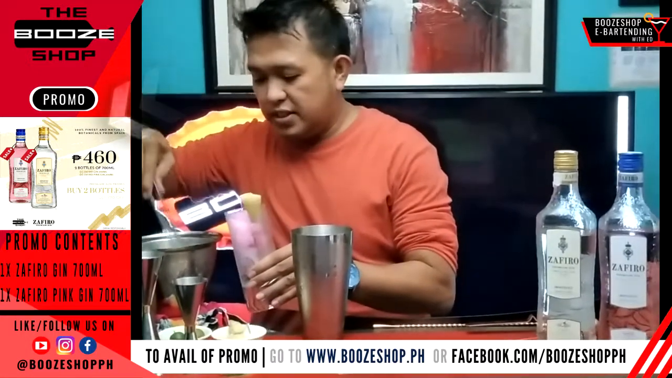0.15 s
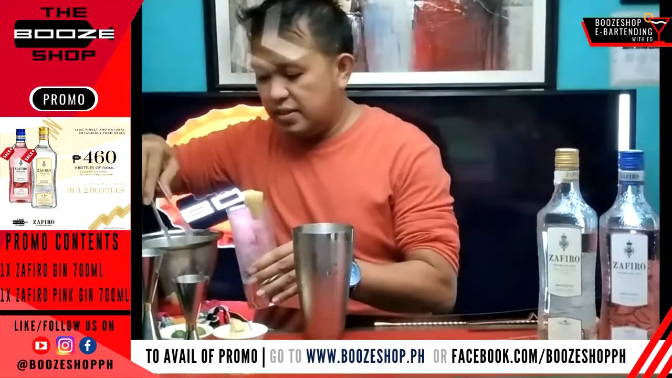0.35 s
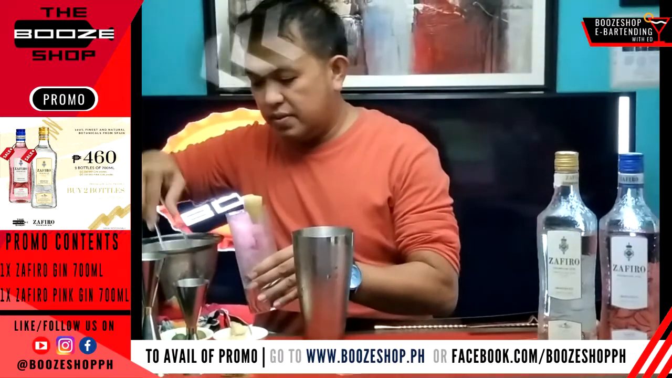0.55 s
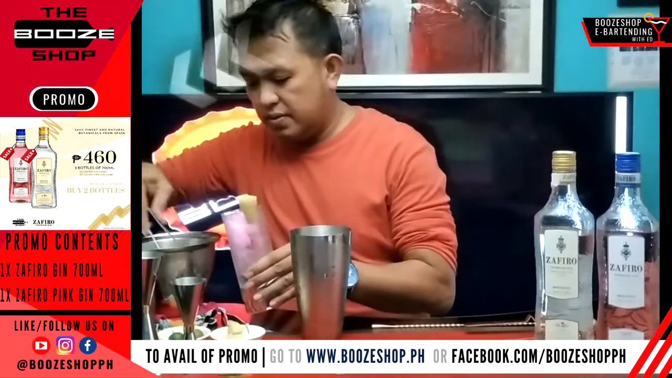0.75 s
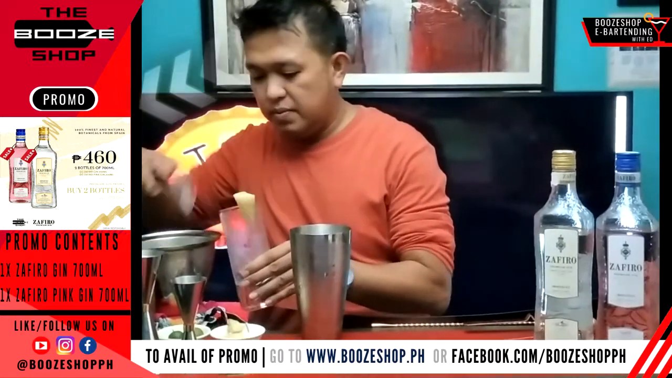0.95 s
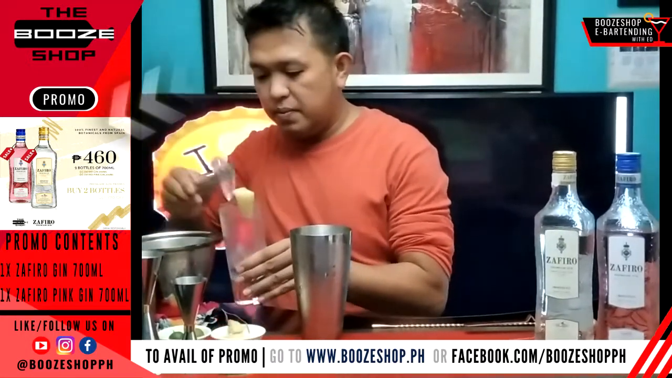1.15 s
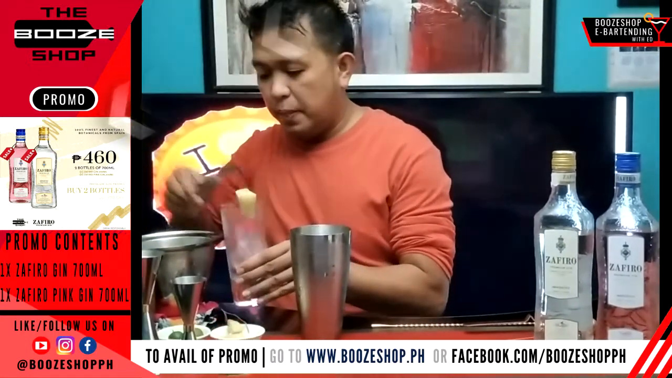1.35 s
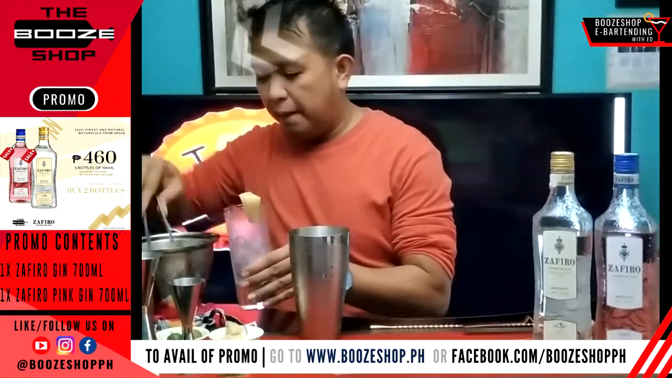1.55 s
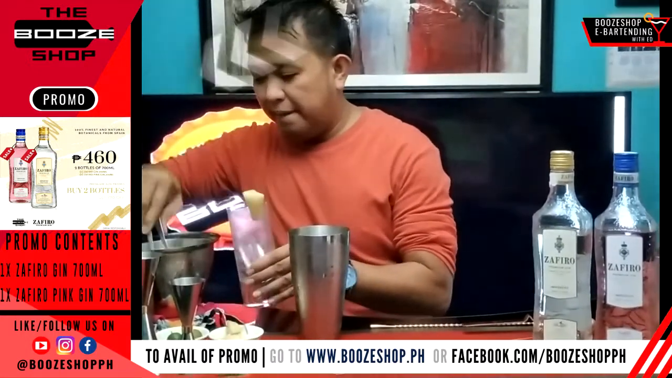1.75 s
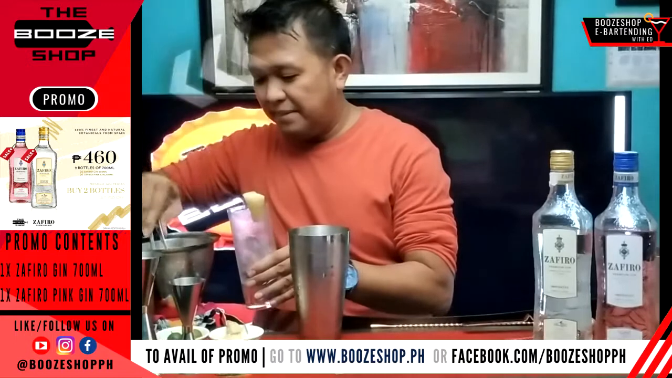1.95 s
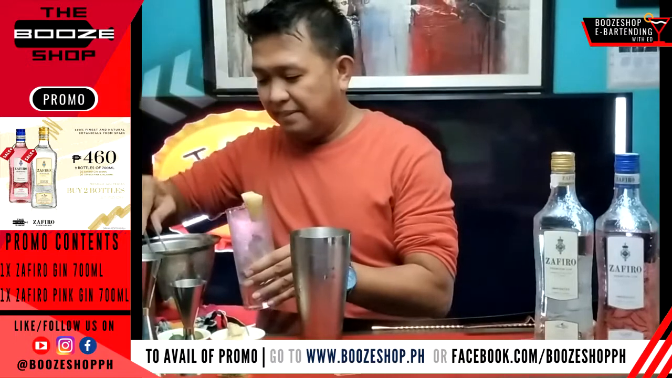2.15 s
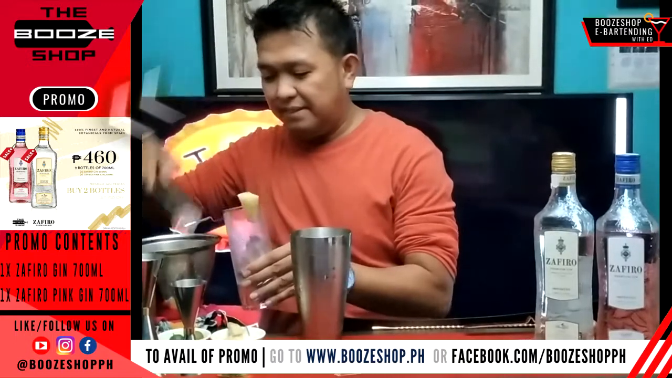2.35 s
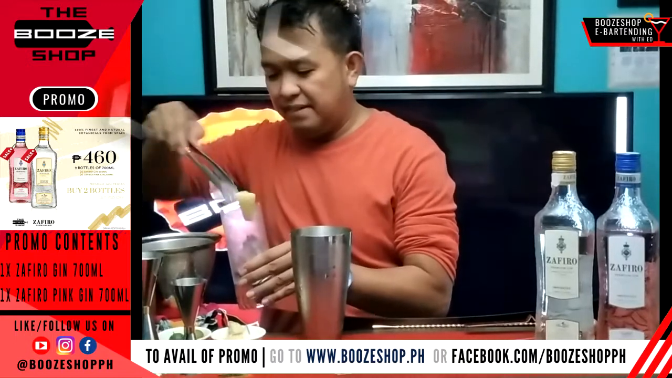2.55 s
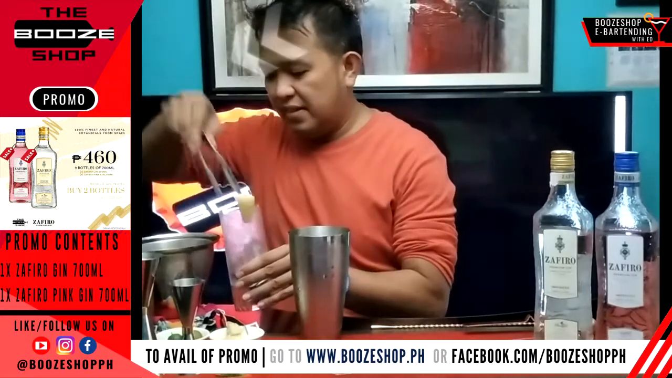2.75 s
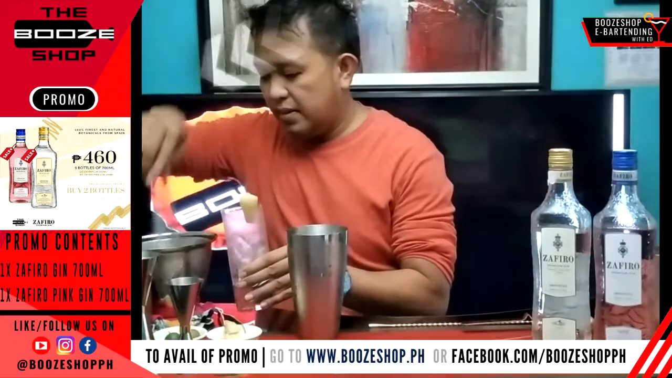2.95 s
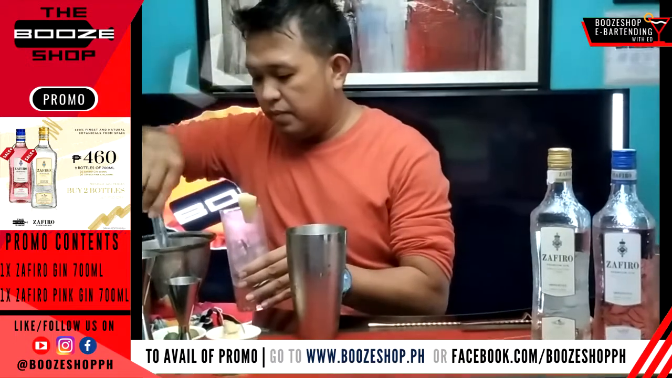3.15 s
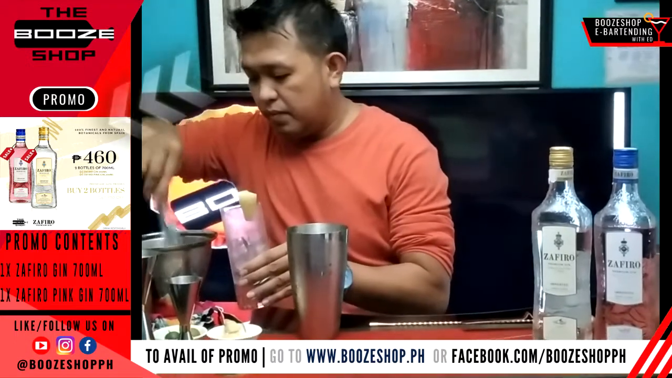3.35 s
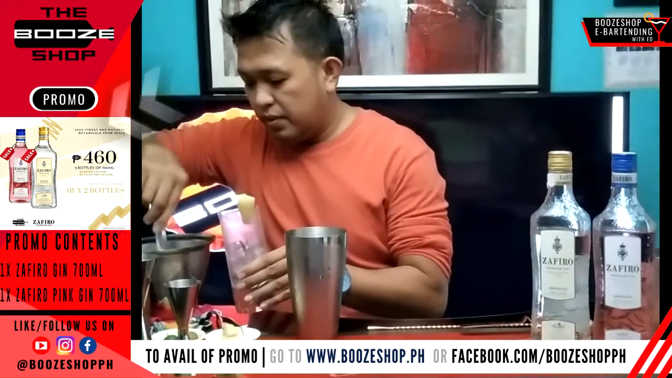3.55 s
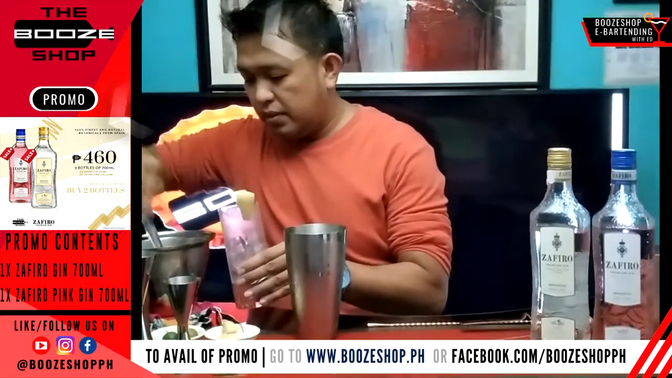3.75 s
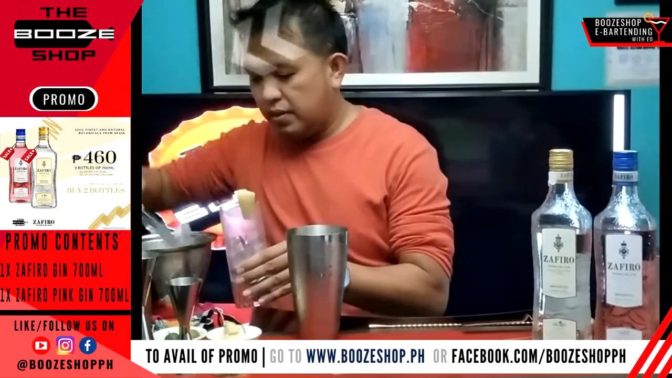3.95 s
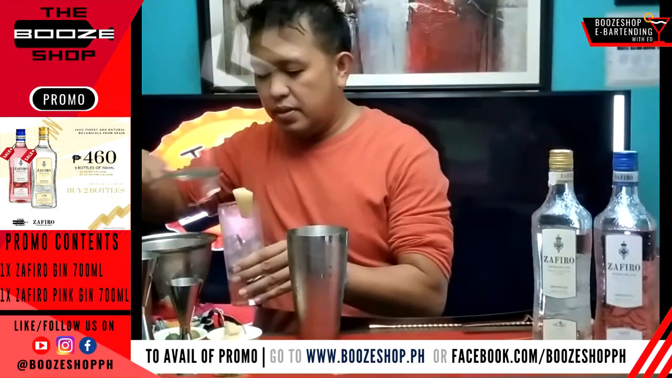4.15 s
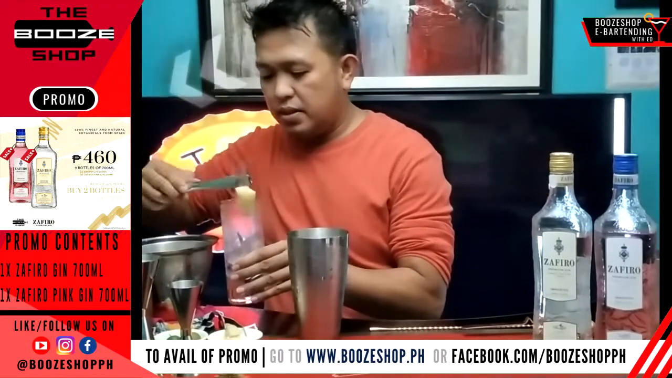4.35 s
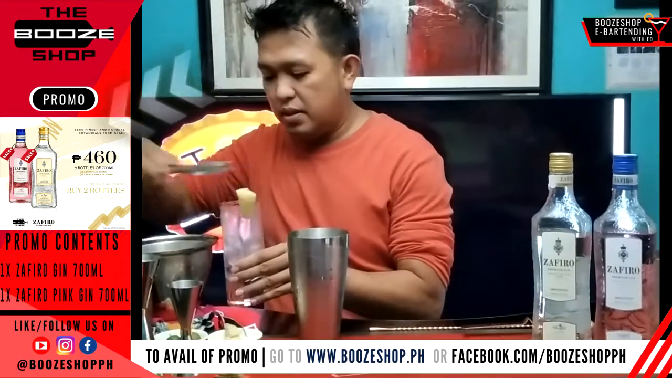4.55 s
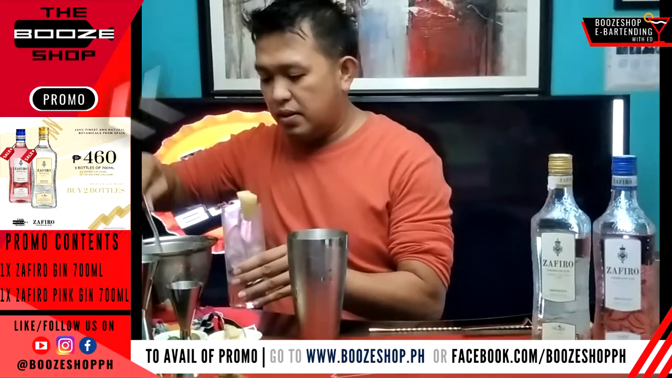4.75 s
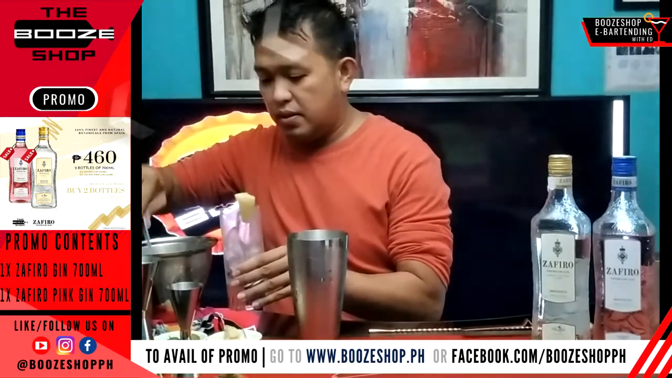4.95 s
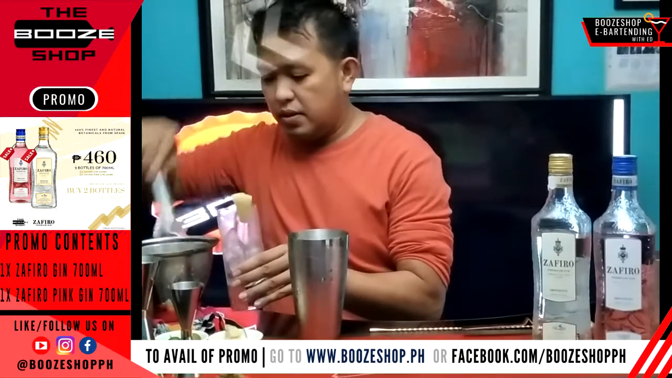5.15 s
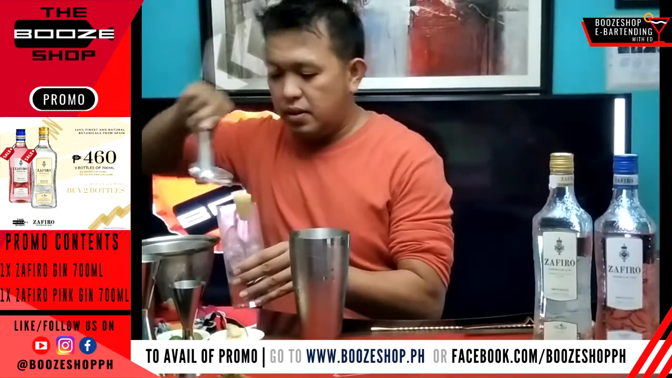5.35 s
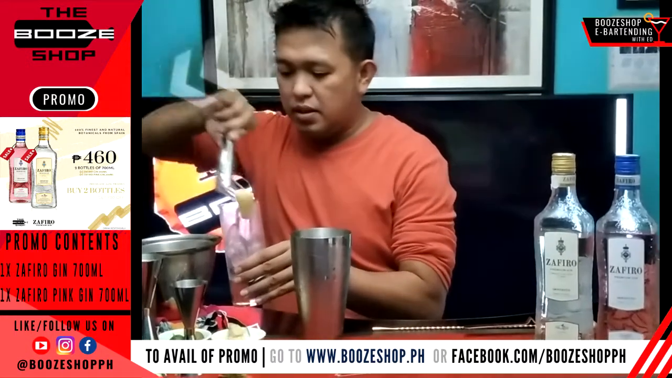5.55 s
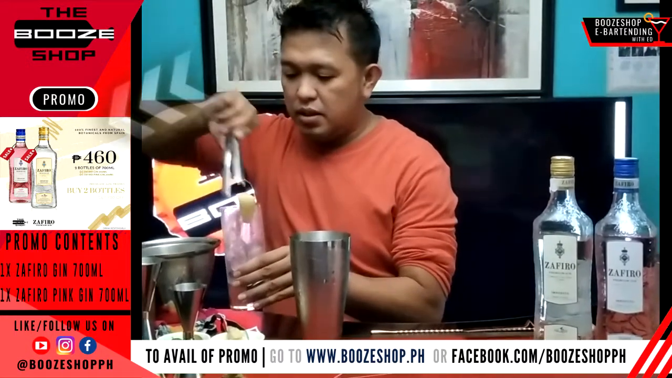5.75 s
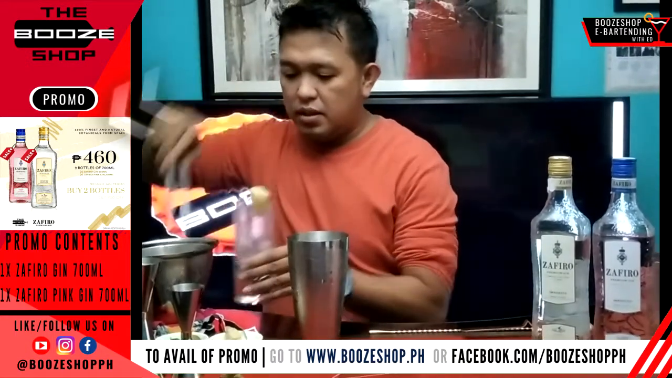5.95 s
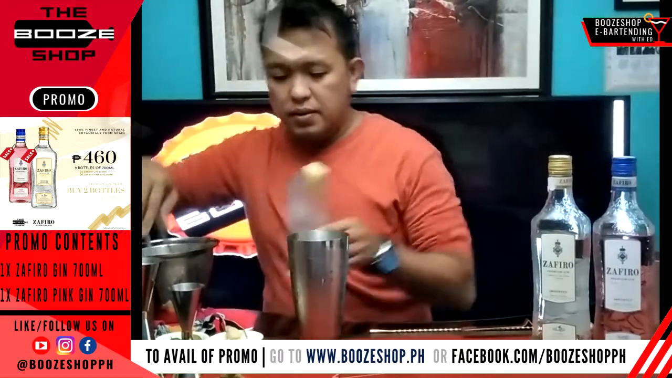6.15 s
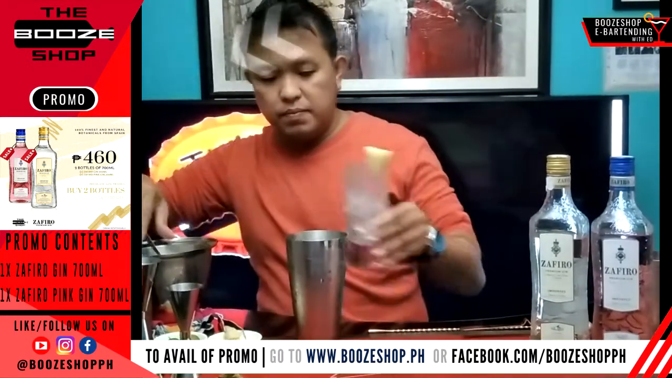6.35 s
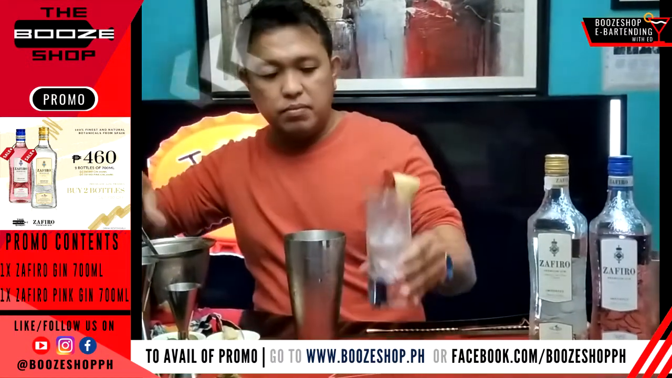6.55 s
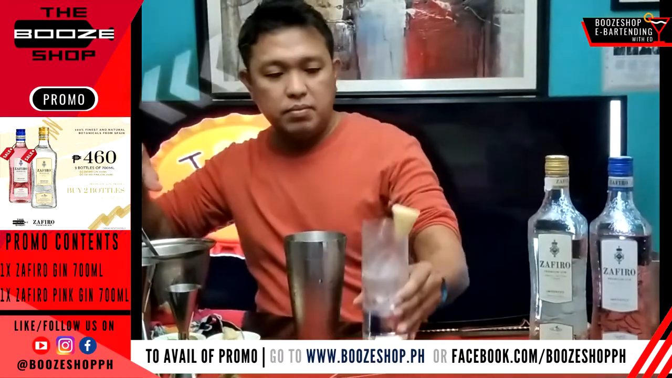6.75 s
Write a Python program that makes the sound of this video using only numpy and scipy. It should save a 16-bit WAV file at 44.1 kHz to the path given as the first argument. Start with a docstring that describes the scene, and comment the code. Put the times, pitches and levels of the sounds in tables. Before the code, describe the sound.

Ice cubes scrape and click in a metal bucket, then drop in small bursts into a tall glass, ringing brightly in a small live room.

```python
"""Ice cubes click and grind in a metal bucket; four times, steel tongs drop some into a tall hand-held glass.
They bounce and ring the glass modes; at last the tongs go back and the glass is moved with a clack.
Around them: noise-burst clicks, stick-slip scrapes, random chinks, and pitched knocks, ticks and squeaks.
A small live room with air noise and a low hum, heard by a phone with two treble-resonant microphone ports."""
import sys
import numpy as np
from scipy import signal
from scipy.fft import rfft, irfft, next_fast_len
from scipy.io import wavfile
from scipy.ndimage import uniform_filter1d, minimum_filter1d

SR = 44100
rng = np.random.default_rng(int(sys.argv[2]) if len(sys.argv) > 2 else 0)


def file_out(sig):
    """Save sig as 16-bit WAV at sys.argv[1]."""
    # one column per channel
    cols = np.atleast_2d(sig).T
    # limit, then scale
    lim = np.clip(cols, -1, 1)
    pcm = np.round(lim * 32767).astype(np.int16)
    wavfile.write(sys.argv[1], SR, pcm)


N = 303981

# ice striking the glass: start_s, relative level_db, contact sharpness_db, cube pitch_hz
DROPS = [(1.286, -16.5, 13, 2350), (1.3075, -3.5, 9.5, 2490), (1.319, -5.5, 6, 3690),
         (1.436, -24, -7, 2470), (1.467, -16.5, -2.5, 2710), (1.529, -22.5, -1.5, 2760),
         (1.826, -29.5, 6, 2334), (2.560, -26.5, -13.5, 2320), (2.701, -18, -10.5, 2334),
         (2.729, -21.5, 11.5, 2270), (2.7425, -7.5, 6, 2350), (2.764, -20.5, -15, 4900),
         (2.7858, -10.5, 7, 3080), (2.817, -14.5, -9.5, 2984), (4.2005, -42, -4, 2350),
         (4.356, -23.5, 0.5, 2270), (4.368, -21, 4.5, 2200), (4.379, -11, -4, 3290),
         (4.389, -13, -7.5, 4750), (4.639, -37, -3.5, 10630), (5.613, -47, 14, 2480),
         (5.6395, -22.5, 3, 2310), (5.657, -16, 2, 2406), (5.672, -15, -3.5, 4800),
         (5.712, -18.5, -2, 4900), (5.850, -27.5, -2.5, 4730), (5.884, -38, -14, 4940),
         (6.371, -25, 6, 3400), (6.512, -27.5, 4.5, 4790), (6.519, -31, 0.5, 2860)]
# load in the glass: from_s, treble_db, crack_db, cube_ring_db, lowest_modes_db, highest_modes_db
LOADS = [(1.2, -2.5, -16, 1, -6.5, -8), (2.5, 12, -8.5, -0.5, 4.5, -0.5), (4.1, 13, 10, 1, -15, -3),
         (5.5, -3, -1, 7.5, -8, -14), (6.2, 9, -10.5, 8, -17, -7)]
# tall glass damped by the hand, nominal modes: mode_hz, relative level_db, t60_s
GLASS_MODES = [(713, -6, .25), (830, -20, .06), (1660, -8, .05), (2365, -1, .1), (2950, -5, .07),
               (3300, -12, .08), (3650, -6, .09), (4780, -7, .06), (7000, -1, .07), (7250, -10, .025),
               (8160, -2, .06), (8290, -6, .05), (8680, -8, .08), (11960, -7, .05), (12920, -5, .06)]
# sharpest clicks of tongs and cubes in the bucket: start_s, relative level_db, lowest_ring_hz
CLICKS = [(0.061, -17, 4900), (.067, -13.5, 5060), (0.216, -18.5, 3070), (.228, -59, 3900),
          (.536, -20.5, 3800), (0.596, -20.5, 3600), (1.623, -19.5, 4800), (1.921, -13, 5750),
          (2.691, -37, 6940), (2.946, -20.5, 5370), (2.985, -14.5, 3760), (3.06, -15.5, 4050),
          (3.302, -36.5, 7840), (3.558, -26.5, 4000), (3.858, -26, 5940), (4.31, -27.5, 7760),
          (4.85, -37.5, 6950), (4.908, -23.5, 7100), (6.267, -19.5, 3150), (6.3676, -16, 4630)]
# tongs pushing through the ice: start_s, length_s, settle_s, relative level_db, lowest_ring_hz
SCRAPES = [(0, 0.16, 0.39, -26, 3730), (0.481, 0.05, .1, -32.5, 4420), (0.538, 0.13, 0.094, -27, 3580),
           (1.618, 0.037, 0.68, -30, 6260), (1.896, 0.093, 0.35, -31, 3700),
           (2.643, 0.076, .2, -36.5, 7850), (2.95, .15, 0.55, -29.5, 3280),
           (3.361, 0.064, 0.092, -33, 5540), (3.41, 0.17, 0.94, -22, 3120),
           (4.202, 0.016, 0.22, -35.5, 7340), (4.773, 0.13, 0.084, -34.5, 7320),
           (6.102, 0.091, 0.57, -24, 5740)]
# short pitched knocks, ticks and squeaks of ice, bucket and glass: start_s, relative level_db, pitch_hz
PITCHED_KNOCKS = [(.066, -24, 4200), (0.125, -30, 1800), (.134, -35.5, 1010), (.631, -27.5, 3300),
                  (2.029, -30, 3000), (2.06, -32.5, 3410), (2.82, -31.5, 1640), (2.983, -42, 1640),
                  (3.17, -44, 592), (3.219, -42, 1560), (3.444, -26, 796), (3.451, -29, 1640),
                  (3.692, -28.5, 1860), (3.855, -23.5, 1903), (4.013, -41, 3600), (4.021, -38, 4230),
                  (4.38, -17, 2110), (6.111, -45, 2650), (6.267, -27, 768)]
# spectral shape of the room's steady noise: point_hz, relative density_db
AIR = [(20, -10.5), (55, 4.5), (90, -9.5), (160, -14), (400, -9.5), (560, -17), (800, -13), (1050, -18),
       (2200, -17), (4000, -25.5), (7000, -38), (15500, -51)]
# hum of the mains and of a small motor: line_hz, relative level_db
HUM = [(60, -59.5), (64.2, -67), (120, -60), (191, -62), (320, -61.5), (386, -74)]
# microphone ports, left then right: resonance_hz, width_hz, gain_db
PORTS = [(7810, 1090, -10.5), (11470, 1160, -10.5)]

TIME = np.arange(N) / SR
RING_TIME = TIME[:2 * SR // 5]
PUSH_TIME = TIME[:3 * SR // 4]
# dB per dB of sharpness: a sharp corner is brighter and cracks more, a blunt face lets the cube sing
TREBLE_PER_DB, CRACK_PER_DB, RING_PER_DB = 0.3, 1.15, 0.51
# bucket boom relative to the ice at PUSH_DB; it stands out more under a lighter push
BODY_DB, BODY_PER_DB, PUSH_DB = -13, 0.5, -25
NUDGE_S = 6.3452
AIR_DB = -43.5
PORT_LEAK_DB = -26.5  # sound that passes beside the resonance
TOP_HZ = 15600


def amp(db):
    """Decibels to gain."""
    return 10 ** (np.asarray(db) / 20)


def unit(x):
    """Scale to rms 1."""
    return x / np.sqrt(np.mean(x ** 2))


def blow(x):
    """Scale a short sound to the energy of 10 ms at rms 1."""
    return x * np.sqrt(SR / 100 / np.sum(x ** 2))


def fade(t60_s):
    """Exponential decay, 60 dB down after t60_s."""
    return np.exp(-np.log(1000) * RING_TIME / t60_s)


def add(track, start_s, sound):
    """Mix a sound into a track at start_s."""
    i = max(int(start_s * SR), 0)
    track[i:i + len(sound)] += sound[:N - i]


def ring(hz, t60_s):
    """One struck mode: a decaying sine."""
    return np.sin(2 * np.pi * hz * RING_TIME) * fade(t60_s)


def resonate(x, hz, width_hz, kind):
    """Two-pole resonance that passes the low side, the band or the high side."""
    size = next_fast_len(len(x) + SR // 10)
    s = 1j * np.arange(size // 2 + 1) * SR / size / hz
    loss = s * width_hz / hz
    top = {"low": 1, "band": loss, "high": s * s}[kind]
    return irfft(rfft(x, size) * top / (s * s + loss + 1), size)[:len(x)]


def crack(t60_s, spread_db=3):
    """One contact: a few milliseconds of uneven chatter."""
    noise, level = rng.standard_normal((2, len(RING_TIME)))
    return noise * amp(spread_db * level) * fade(t60_s)


def cubes(force, hz, width_share=0.38, skirt=0.53):
    """Ice radiates from its lowest ring upwards: two high-pass resonances."""
    ringing = resonate(force, hz, hz * width_share, "high")
    return resonate(ringing, hz * skirt, hz * skirt, "high")


def contact_colour(start_s, sharp_db):
    """Levels in dB of a blow's parts, from the load and the contact's sharpness."""
    load = [row for row in LOADS if row[0] <= start_s][-1]
    _, treble_db, crack_db, cube_db, low_db, top_db = load
    treble_db = treble_db + TREBLE_PER_DB * sharp_db
    crack_db = crack_db + CRACK_PER_DB * sharp_db
    cube_db = cube_db - RING_PER_DB * sharp_db
    return treble_db, crack_db, cube_db, low_db, top_db


def glass(shift_share=0.0065, spot_db=1.0, cube_width=0.056,
          crack_t60_s=0.016, crack_hz=2300, snap_t60_s=0.0084, snap_db=-3):
    """Each landing rings glass and cube; ice leaning on the wall shifts the modes a little every time."""
    out = np.zeros(N)
    hz, mode_db, t60_s = np.transpose(GLASS_MODES)
    for start_s, db, sharp_db, cube_hz in DROPS:
        treble_db, crack_db, cube_db, low_db, top_db = contact_colour(start_s, sharp_db)
        # the load weights the lowest and highest modes; the treble tilt saturates at 7 kHz
        load_db = low_db * (hz < 1000) + top_db * (hz > 10000)
        tilt_db = treble_db * np.clip(np.log2(hz / 3500), 0, 1)
        gains = amp(mode_db + tilt_db + load_db)
        # the spot that is struck sets each mode's sign and strength
        spot = rng.choice([-1, 1], len(hz)) * amp(spot_db * rng.standard_normal(len(hz)))
        shifted_hz = hz * (1 + shift_share * rng.standard_normal(len(hz)))
        wall = sum(g * blow(ring(f, t)) for g, f, t in zip(gains * spot, shifted_hz, t60_s))
        # snap plus longer chatter sets off the cube's short, rough ring
        snap = amp(snap_db) * blow(crack(snap_t60_s))
        contact = cubes(snap + blow(crack(crack_t60_s)), crack_hz)
        cube = resonate(contact, cube_hz, cube_hz * cube_width, "band")
        mix = blow(wall) + amp(cube_db) * blow(cube) + amp(crack_db) * blow(contact)
        add(out, start_s, amp(db) * mix)
    # a small glass radiates next to nothing below its lowest mode
    return resonate(out, 690, 400, "high")


def clicks():
    """Dry clicks of ice and steel: short chatter through the ice resonance."""
    out = np.zeros(N)
    for start_s, db, hz in CLICKS:
        add(out, start_s, amp(db) * blow(cubes(crack(t60_s=0.008), hz)))
    return out


def pressure(t_s, length_s, settle_s, rise_s=0.002):
    """A push of the tongs builds, holds for its length and ebbs as the heap settles."""
    build = 1 - np.exp(-t_s / rise_s)
    return build * np.exp(-np.log(1000) * np.maximum(t_s - length_s, 0) / settle_s)


def slips(length_s, settle_s, rate_hz=150, spread_db=1.0):
    """Stick and slip of one cube: random tiny pushes of either sign, exponentially spread in dB."""
    when, sign, size = rng.random((len(PUSH_TIME), 3)).T
    pushes = (when < rate_hz / SR) * np.sign(sign - .5) * amp(-spread_db * np.log(size))
    return pressure(PUSH_TIME, length_s, settle_s) * pushes


def scrapes(count=4, size_spread=0.05, slip_t60_s=0.012):
    """Several cubes of unlike size slip at once, each with its own click; the bucket booms along."""
    out = np.zeros(N)
    for start_s, length_s, settle_s, db, hz in SCRAPES:
        forces = []
        for _ in range(count):
            force = signal.fftconvolve(slips(length_s, settle_s), crack(slip_t60_s))
            forces.append(force[:len(PUSH_TIME)])
        ice = sum(cubes(force, hz * (1 + size_spread * k / count)) for k, force in enumerate(forces))
        push = sum(forces)
        body = resonate(push, 874, 270, "band") + resonate(push, 1760, 460, "band")
        body_db = BODY_DB - BODY_PER_DB * (db - PUSH_DB)
        # longer pushes carry more energy
        sounding_s = length_s + settle_s / (2 * np.log(1000))
        mix = unit(ice) + amp(body_db) * unit(body)
        add(out, start_s, amp(db) * mix * np.sqrt(sounding_s / PUSH_TIME[-1]))
    return out


def chinks(count=40, rate_hz=110, t60_s=0.01, spread_db=9, top_hz=13500):
    """During a push, loose cubes and chips knock at random, each with a brief ring of its own pitch."""
    out = np.zeros(N)
    for start_s, length_s, settle_s, db, hz in SCRAPES:
        wait, pitch, size = rng.random((count, 3)).T
        times_s = np.cumsum(-np.log(wait)) / rate_hz
        gains = pressure(times_s, length_s, settle_s) * amp(db + spread_db * size)
        chips_hz = hz * (top_hz / hz) ** pitch
        for t_s, gain, chip_hz in zip(times_s, gains, chips_hz):
            add(out, start_s + t_s, gain * blow(ring(chip_hz, t60_s)))
    return out


def pitched_knocks(width_share=0.056):
    """Each is one brief, damped resonance, from low and hollow to high and squeaky."""
    out = np.zeros(N)
    for start_s, db, hz in PITCHED_KNOCKS:
        tone = resonate(crack(t60_s=0.0044), hz, hz * width_share, "band")
        add(out, start_s, amp(db) * blow(resonate(tone, hz, hz / 2, "band")))
    return out


def nudge(low_hz=2400, high_hz=4830, width_hz=300, high_db=-4):
    """Carried towards the phone, the full glass gives one short, dry clack as its ice shifts."""
    out = np.zeros(N)
    force = cubes(crack(t60_s=0.0024), 2800)
    low = blow(resonate(force, low_hz, width_hz, "band"))
    high = blow(resonate(force, high_hz, width_hz, "band"))
    add(out, NUDGE_S, low + amp(high_db) * high)
    return out


def room(x, direct_db, early_db=-5, early_t60_s=0.23, low_t60_s=0.38, high_t60_s=0.3,
         split_hz=3000, gap_s=0.0016):
    """Direct sound, sparse reflections from counter and bottles, and a diffuse tail, at one port."""
    noise, early_noise, chance = rng.standard_normal((3, len(RING_TIME)))
    low = signal.sosfilt(signal.butter(2, split_hz, fs=SR, output="sos"), noise)
    tail = low * fade(low_t60_s) + (noise - low) * fade(high_t60_s)
    early = early_noise * (chance > 2) * fade(early_t60_s)
    response = tail / np.linalg.norm(tail) + amp(early_db) * early / np.linalg.norm(early)
    response = response * (RING_TIME > gap_s)
    response[0] += amp(direct_db)
    return signal.fftconvolve(x, response)[:N]


def background(shared_hz=500):
    """Steady air, alike at both ports in the bass, under a gently wavering hum."""
    hz = np.maximum(np.arange(N // 2 + 1) * SR / N, 1)
    points_hz, db = np.transpose(AIR)
    colour = amp(np.interp(np.log(hz), np.log(points_hz), db))
    mid, side = rfft(rng.standard_normal((2, N))) * colour
    side = side * hz / np.hypot(hz, shared_hz)
    air = unit(irfft(np.array([mid + side, mid - side]), N))
    hum = 0
    for line_hz, line_db in HUM:
        waver = np.interp(TIME, np.linspace(0, TIME[-1], 20), rng.standard_normal(20))
        tone = np.sin(2 * np.pi * (line_hz * TIME + rng.random()))
        hum = hum + np.sqrt(2) * amp(line_db + 2 * waver) * tone
    return amp(AIR_DB) * air + hum


def scene(glass_db=-3, click_db=1, scrape_db=-2, chink_db=-10.0, knock_db=6, nudge_db=-18,
          glass_pan_db=0.37, bucket_pan_db=1.23):
    """Glass and bucket in a live room; their sound reaches the right port a moment before the left."""
    drops = amp(glass_db) * glass()
    bucket = amp(click_db) * clicks() + amp(scrape_db) * scrapes()
    # the pitched knocks share the bucket's place
    bucket = bucket + amp(chink_db) * chinks() + amp(knock_db) * pitched_knocks()
    near = amp(nudge_db) * nudge()
    ports = []
    for side in (.5, -.5):  # left, right
        port = amp(side * glass_pan_db) * room(drops, direct_db=-5.0)
        port = port + amp(side * bucket_pan_db) * room(bucket, direct_db=-6.5)
        ports.append(port + room(near, direct_db=-3.5))
    left, right = ports
    lag_samples = 4
    return np.array([np.pad(left, (lag_samples, 0))[:N], right]) + background()


def record(dry):
    """Ports ring in the treble and leak a little; a fast limiter holds the peaks and the top is cut."""
    ports = np.array([amp(db) * resonate(x, hz, width_hz, "low")
                      for x, (hz, width_hz, db) in zip(dry, PORTS)])
    ports = ports - amp(PORT_LEAK_DB) * dry
    # 133 samples = 3 ms
    gain = minimum_filter1d(1 / np.maximum(np.abs(ports), 1), size=133)
    gain = uniform_filter1d(gain, size=133)
    return signal.sosfilt(signal.ellip(10, .2, 70, TOP_HZ, fs=SR, output="sos"), ports * gain)


dry = scene()
out = record(dry)
file_out(out)
```